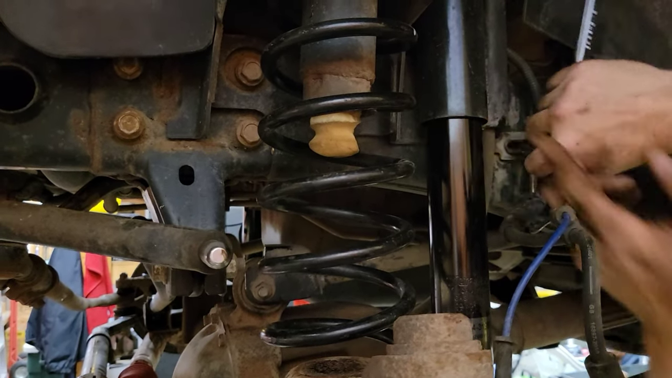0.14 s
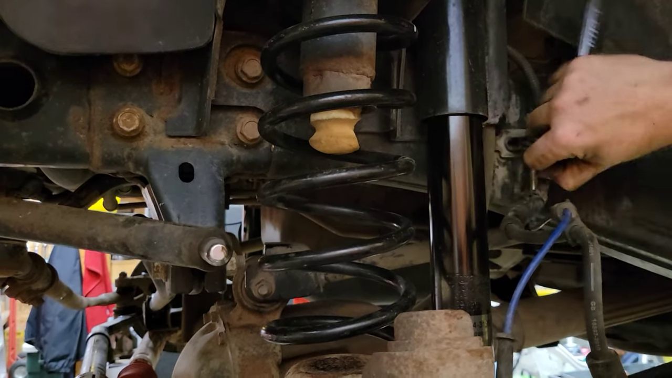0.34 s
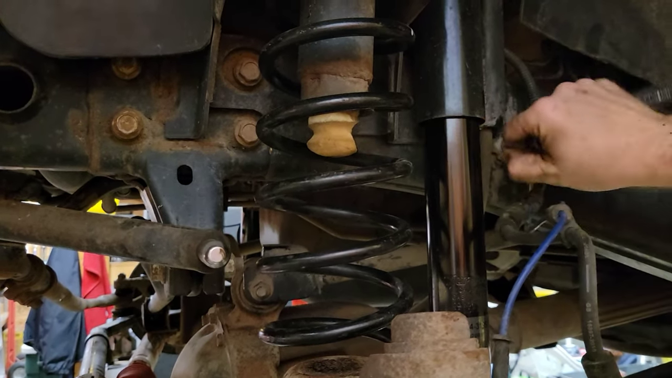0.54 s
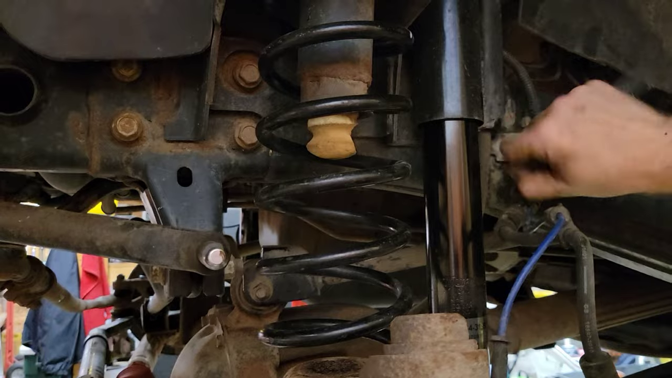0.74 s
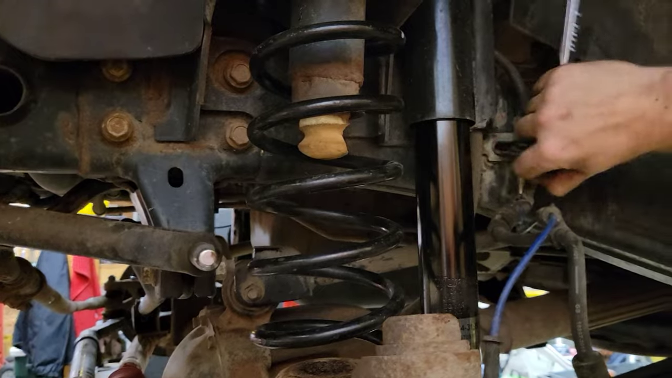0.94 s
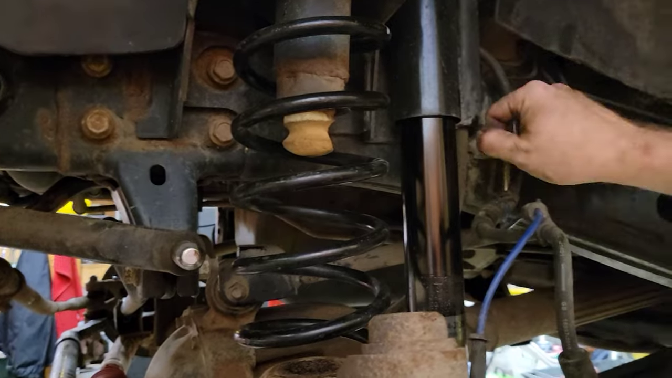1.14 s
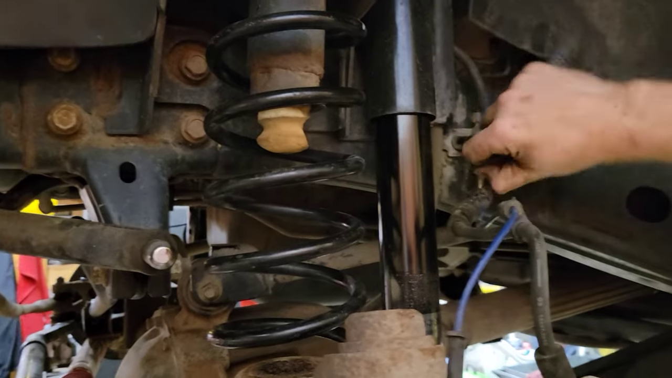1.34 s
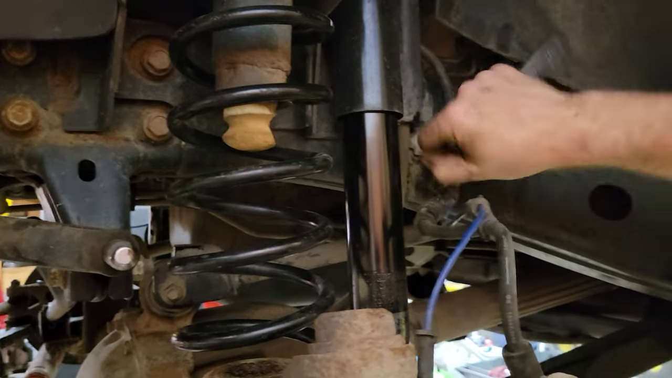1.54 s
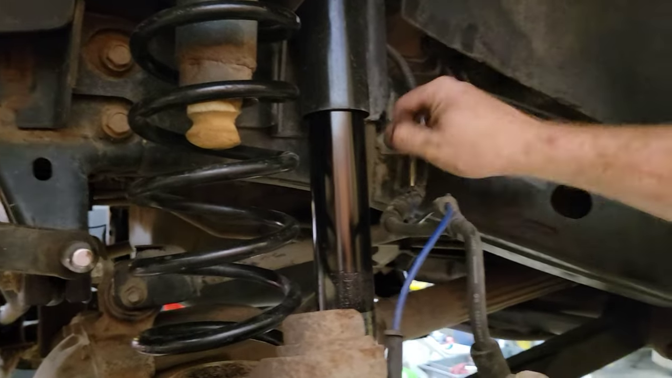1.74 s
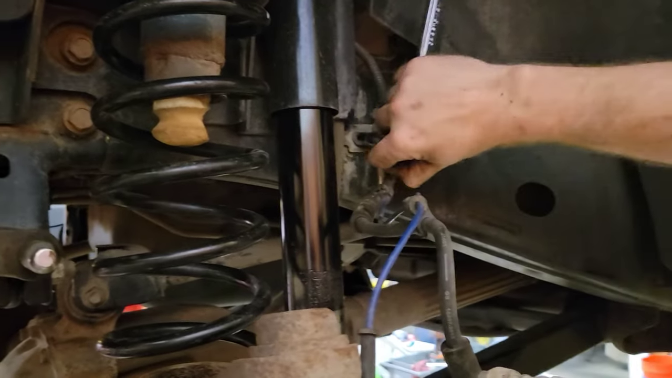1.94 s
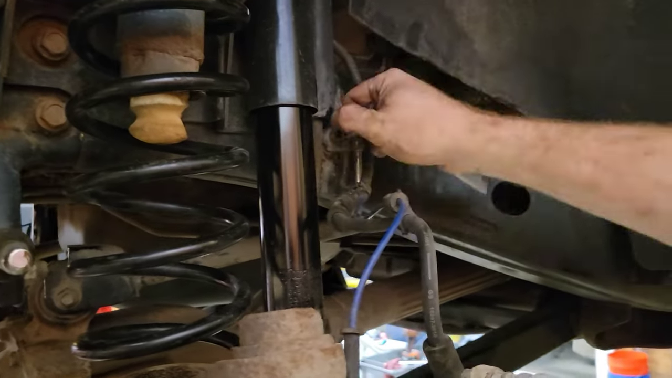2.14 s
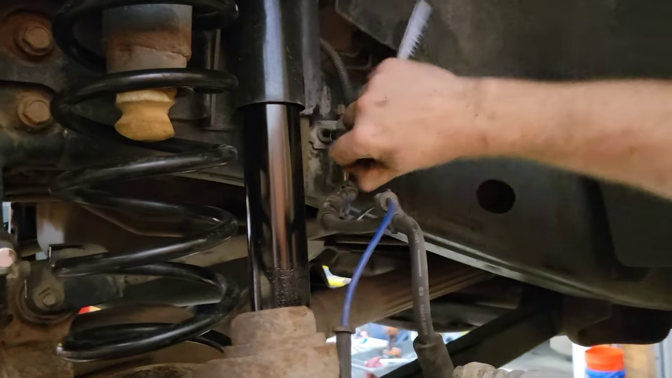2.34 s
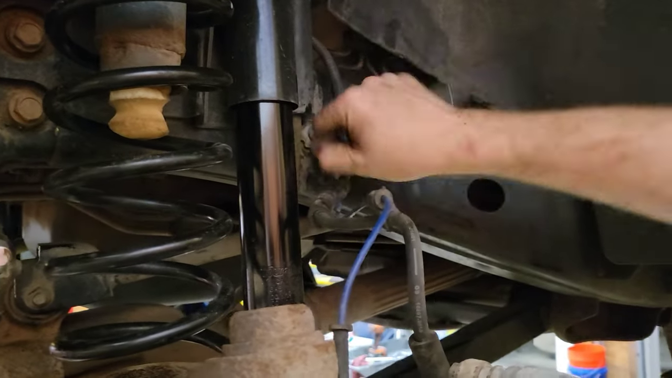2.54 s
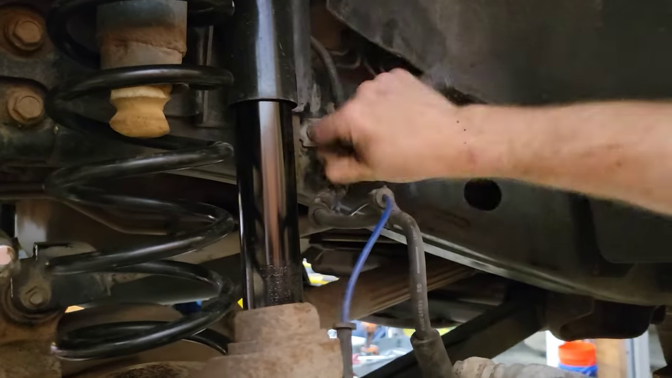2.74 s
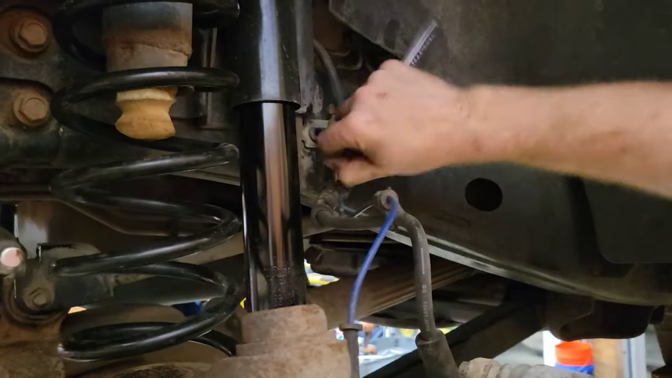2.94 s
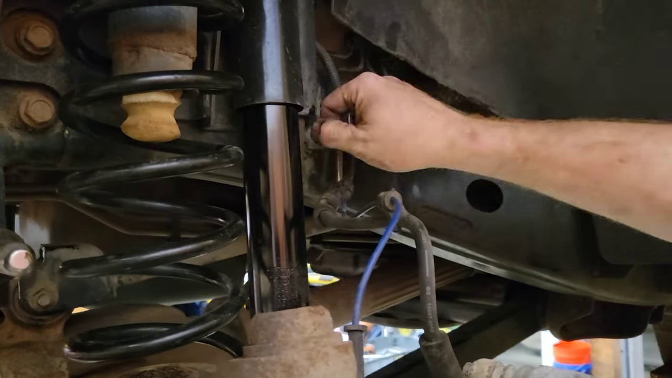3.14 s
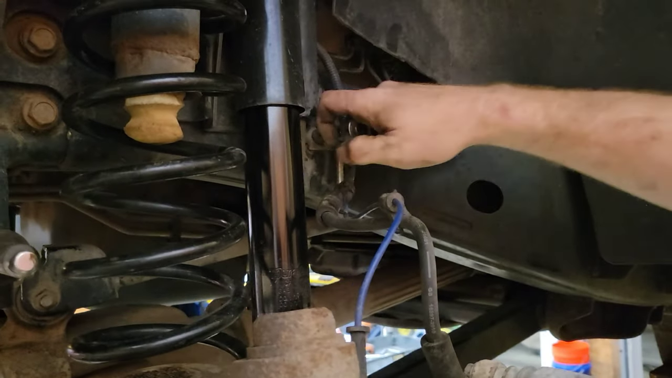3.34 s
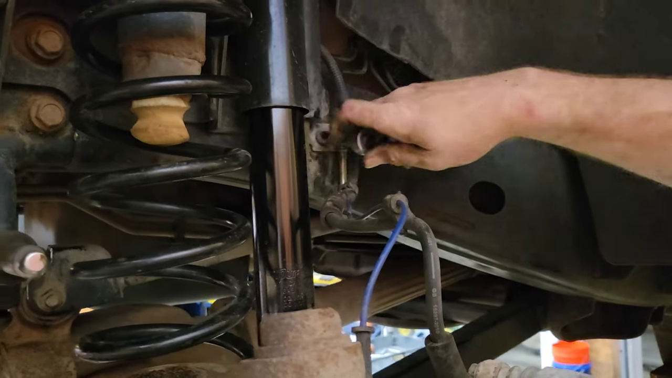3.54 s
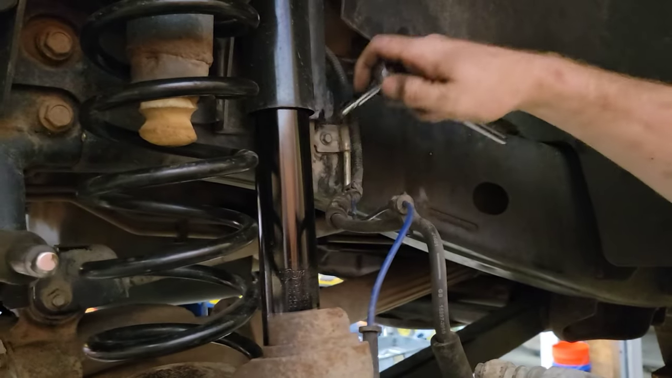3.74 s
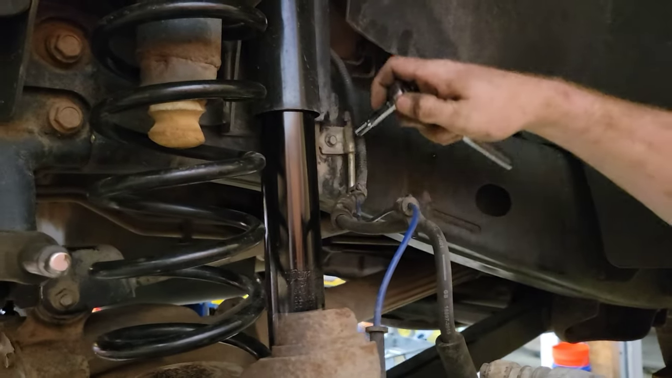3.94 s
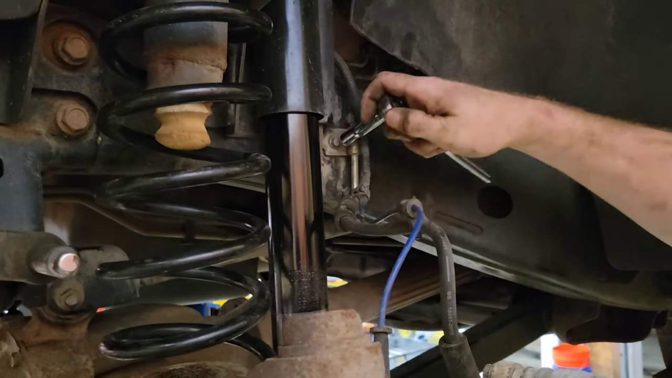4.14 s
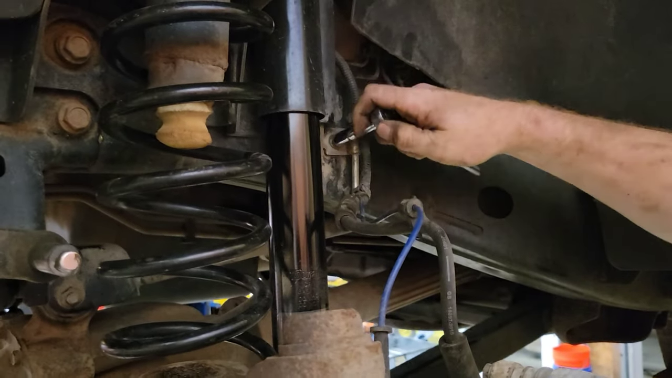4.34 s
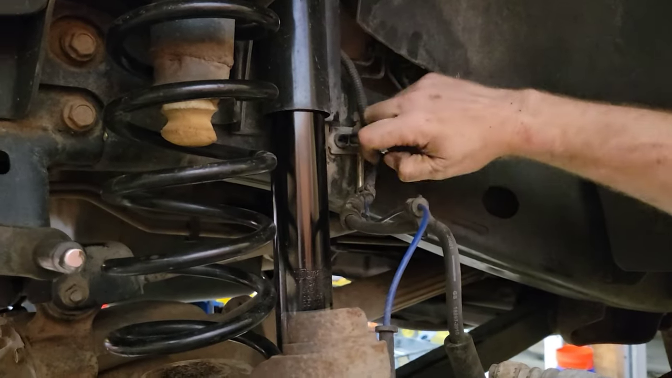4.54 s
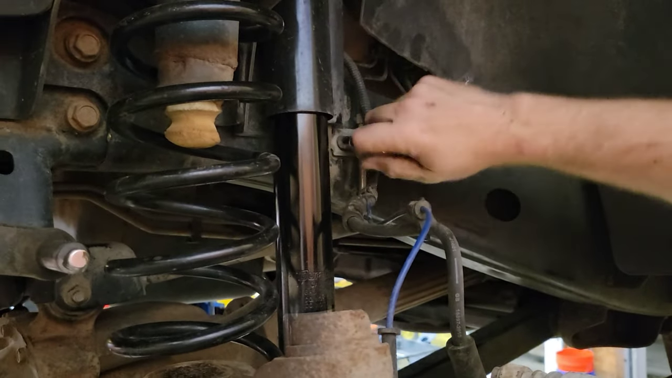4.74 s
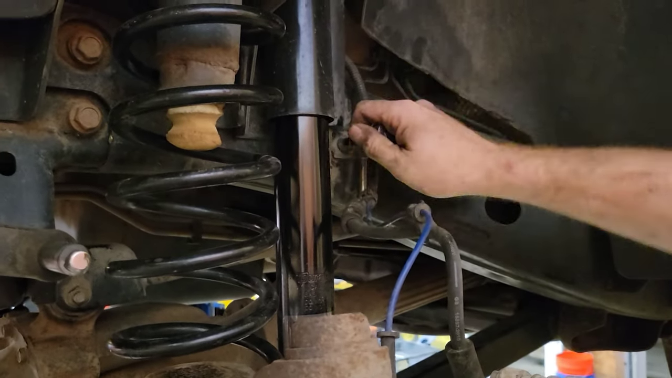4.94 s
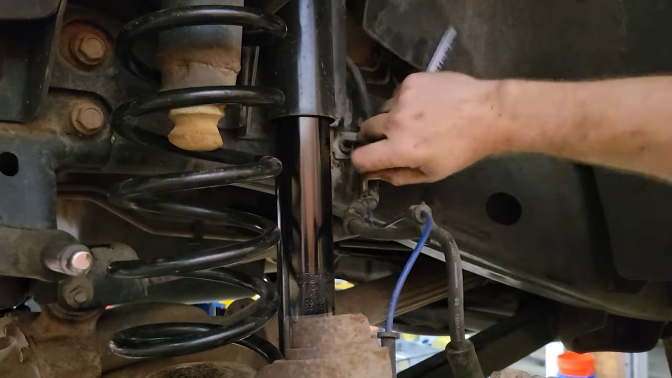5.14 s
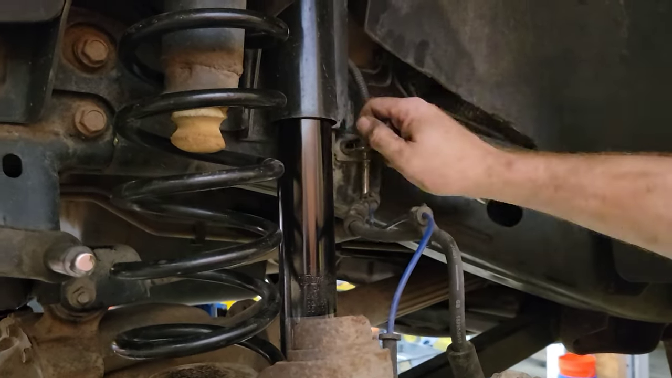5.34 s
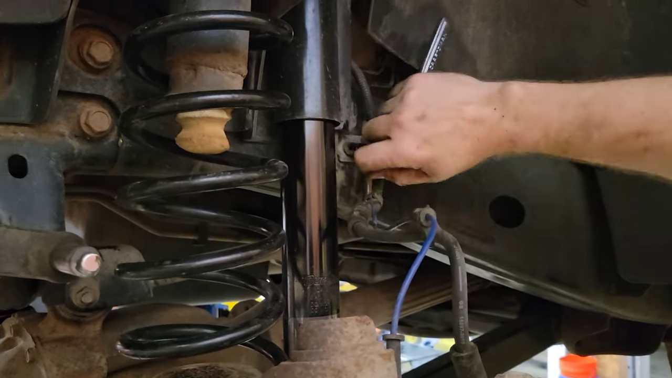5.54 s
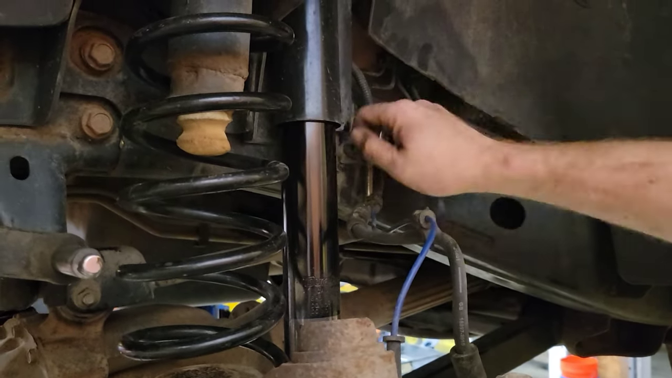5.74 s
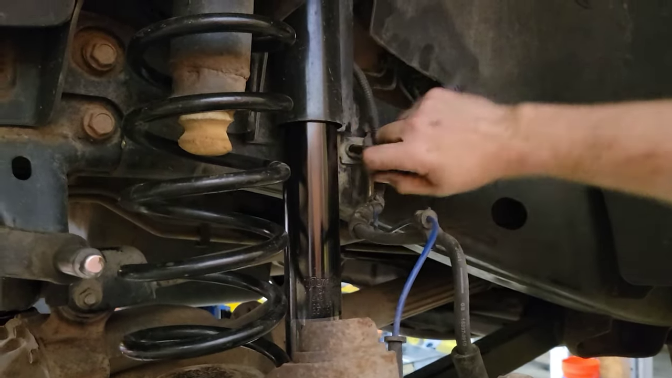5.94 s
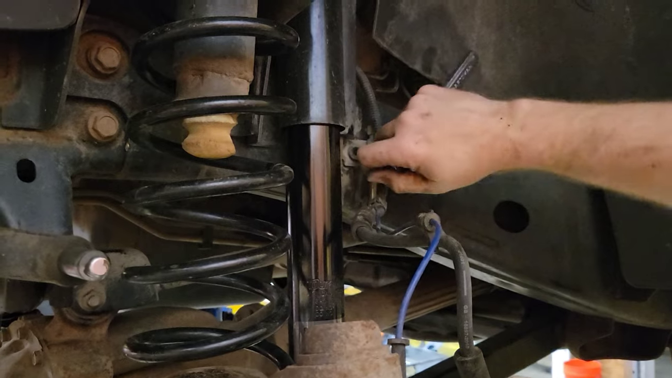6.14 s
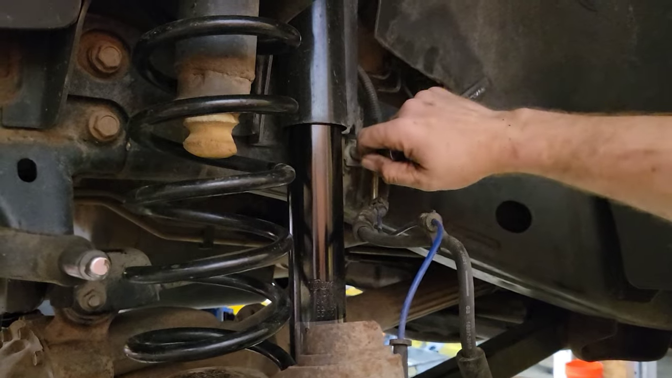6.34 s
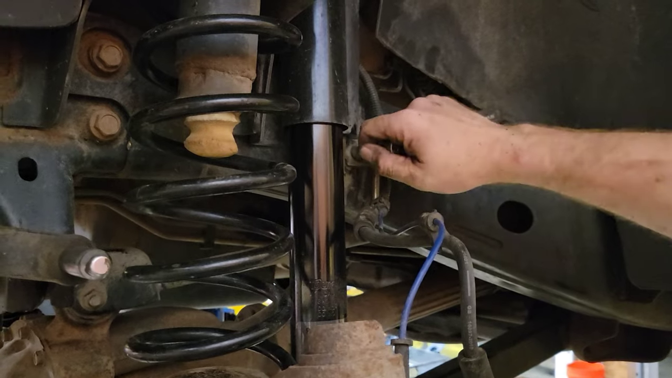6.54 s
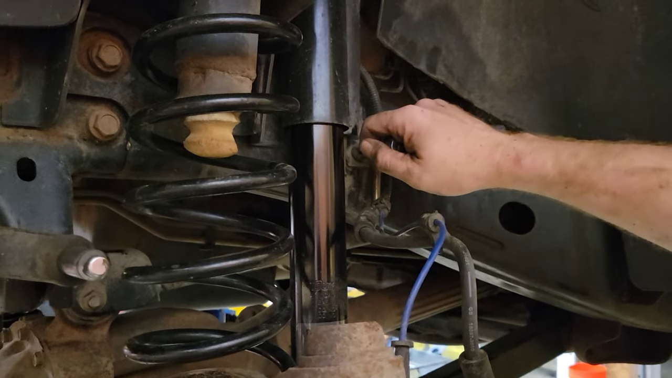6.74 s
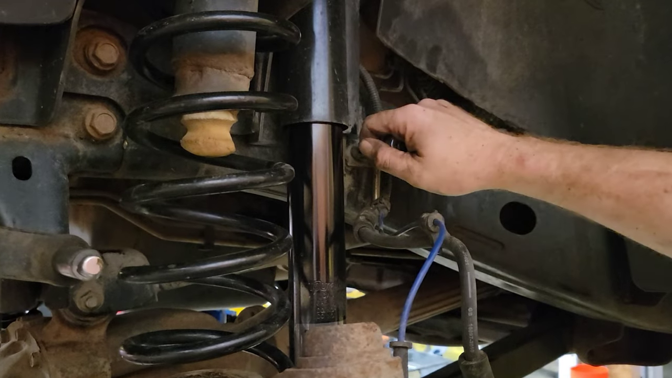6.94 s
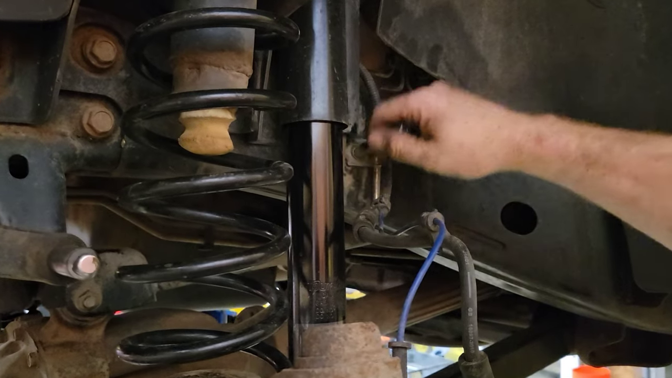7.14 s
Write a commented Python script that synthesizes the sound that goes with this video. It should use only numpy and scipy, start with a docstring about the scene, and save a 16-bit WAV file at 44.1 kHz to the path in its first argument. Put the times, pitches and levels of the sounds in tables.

```python
"""Garage open to a summer day: a socket ratchet works a bolt under a vehicle.
Pawl clicks and socket knocks strike tuned resonators (wrench, steel frame) and shaped noise for
the dense overtones and garage tail. Rub, bright hiss, low rumble and air are noise in the same bands.
Insects outside are narrow flickering noise bands; a nearer one rasps in short buzzes."""
import sys
import numpy as np
from scipy import signal
from scipy.io import wavfile

SR = 44100
rng = np.random.default_rng(int(sys.argv[2]) if len(sys.argv) > 2 else 0)


def ratio(d):
    """dB to gain"""
    e = np.asarray(d, float) / 20
    return 10 ** e


def materialize(psi):
    """Save the field psi as 16-bit PCM at rate SR to the path in sys.argv[1].

    A 1-D psi becomes a single channel; in a 2-D psi each row is a channel.
    """
    bounded = np.clip(np.atleast_2d(psi).T, -1, 1)
    quanta = np.round(bounded * 32767).astype(np.int16)
    wavfile.write(sys.argv[1], SR, quanta)


N = 321048

# bracket and frame modes around the bolt: hz, level_db (relative), t60_s
FRAME = [(198.4, -4, .25), (307.6, -9, 0.3), (355.5, -11, 0.59), (414, -6, 0.19), (487.2, -9.5, 0.25),
         (529.4, -2.5, 0.18), (611, -8.5, .25), (654.5, -9, 0.16), (843, -6, 0.24), (1066, -3.5, .22),
         (1185, -1, .22), (1189, -4.5, 0.11), (1330, -6, 0.15), (1413, -3.5, .15), (1578, -7, 0.23),
         (1793, -2, 0.071), (1850, 2.5, 0.12), (1960, -5, 0.12), (2183, 0.5, 0.08), (2440, -12, 0.071),
         (3130, -14.5, 0.082), (3700, -1.5, 0.11)]
# correlation of left and right: hz, correlation
LIKENESS = [(60, .995), (130, .99), (290, .85), (640, .5), (1400, 0), (15000, .02)]


def in_time(rows, axis=1):
    """Table column interpolated at every sample."""
    rows = np.array(rows)
    return np.interp(np.arange(N) / SR, rows[:, 0], rows[:, axis])


def at_hz(rows, hz, axis=1):
    """Table column read on a log-frequency axis."""
    rows = np.array(rows)
    return np.interp(np.log(hz), np.log(rows[:, 0]), rows[:, axis])


def rms_one(x):
    """Scale to rms 1."""
    return x / np.sqrt(np.mean(x ** 2) + 1e-20)


def drift(rate_hz):
    """Random curve: normal values of spread 1, two per cycle of rate_hz, joined by lines."""
    count = int(N / SR * rate_hz * 2) + 2
    return np.interp(np.arange(N), np.linspace(0, N, count), rng.standard_normal(count))


def dying(x, t60_s):
    """Exponential decay after each impulse, 60 dB of amplitude in t60_s."""
    return signal.lfilter([1], [1, -ratio(-60 / (t60_s * SR))], x + 1e-18)  # offset avoids denormals


def swell(x, rise_s):
    """Spread each impulse over a smooth bump of area 1."""
    window = np.hanning(int(rise_s * SR * 2) + 3)[1:-1]
    return signal.lfilter(window / window.sum(), [1], x)


def later(x, delay_s):
    """The same sound, delayed."""
    return np.pad(x, ((0, 0), (int(delay_s * SR), 0)))[:, :N]


def bandpass(x, low_hz, high_hz):
    """Butterworth band-pass."""
    return signal.sosfilt(signal.butter(2, [low_hz, high_hz], "band", fs=SR, output="sos"), x)


def resonance(x, hz, width_hz):
    """Band-pass run twice: flat top, steep skirts."""
    edges_hz = hz - width_hz / 2, hz + width_hz / 2
    return bandpass(bandpass(x, *edges_hz), *edges_hz)


def strikes(blows, hz, spread_db, signs=False):
    """Stereo impulse train, height of each blow read at this pitch; bass reaches both ears alike."""
    rows, bands_hz = np.array(blows[0]), blows[1]
    level_db = [np.interp(np.log(hz), np.log(bands_hz), row[1:-1]) for row in rows]
    pan_db = np.outer([.5, -.5], rows[:, -1])
    chance = rng.standard_normal((len(rows), 3)).T
    alike = np.clip(at_hz(LIKENESS, hz), 0, 1)
    scatter = np.sqrt(alike) * chance[2] + np.sqrt(1 - alike) * chance[:2]
    heights = ratio(level_db + pan_db + spread_db * scatter)
    if signs and alike < .5:
        heights = heights * rng.choice([-1, 1], (len(rows), 2)).T
    train = np.zeros((2, N))
    train[:, (rows[:, 0] * SR).astype(int)] = heights
    return train


def ringing(blows, modes, level_db, spread_db, rise_s, rough=True):
    """Each blow is a short contact, rough or smooth, that drives two-pole modes at scattered strengths."""
    out = 0
    grit = rng.standard_normal(N) * np.sqrt(rise_s * SR) if rough else 1
    for hz, mode_db, t60_s in modes:
        radius, angle = ratio(-60 / (t60_s * SR)), 2 * np.pi * hz / SR
        contact = swell(strikes(blows, hz, spread_db, signs=True), rise_s)
        push = grit * contact * ratio(level_db + mode_db)
        poles = [1, -2 * radius * np.cos(angle), radius ** 2]
        out = out + signal.lfilter([0, np.sin(angle)], poles, push + 1e-18)
    # high-pass at 0.7 of the lowest mode: nothing sounds far below it
    return signal.sosfilt(signal.butter(2, modes[0][0] * .7, "high", fs=SR, output="sos"), out)


def blow_pan(count):
    """Left minus right in dB for each blow, scattered around a lean to the right."""
    return -1.6 + 1.0 * rng.standard_normal(count)


def click_blows():
    """Pawl drops into teeth: rows of start_s, dB per band, pan_db; then the band centres."""
    # start_s, snap_db (relative)
    clicks = [(0.303, -15), (0.3904, -13.5), (0.9401, -14.5), (0.9524, -8), (0.965, -11), (0.983, -17),
              (1.0138, -18.5), (1.0595, -15.5), (1.4905, -16.5), (1.5016, -19.5), (1.517, -17.0),
              (1.536, -17), (1.565, -15.5), (1.598, -14.5), (1.9759, -14), (1.9942, -14.5), (2.0103, -12),
              (2.024, -13), (2.038, -12.5), (2.053, -14), (2.073, -15.5), (2.1175, -15.5), (2.466, -14),
              (2.4805, -17), (2.4918, -14.0), (2.5038, -15), (2.5175, -9.5), (2.5333, -13), (2.569, -15),
              (2.9293, -16), (2.944, -17), (2.958, -12), (2.971, -12), (2.989, -9.5), (3.012, -14),
              (4.687, -12.5), (4.7211, -14), (4.774, -14.5), (4.809, -13), (5.1991, -21.5), (5.2074, -14.5),
              (5.2177, -12.5), (5.233, -15.5), (5.257, -15), (5.285, -14.5), (5.63, -15), (5.6405, -17.5),
              (5.6496, -15.0), (5.6622, -13), (5.6761, -18), (5.6945, -13), (5.72, -14.5), (6.0888, -13.5),
              (6.101, -14.5), (6.1146, -16), (6.1286, -15.5), (6.1557, -16.0), (6.204, -17.0)]
    # wrench ring at 2-5 kHz as the grip changes: time_s, level_db (relative)
    click_ring = [(.3, -26.5), (1, -22.5), (1.55, -22.5), (2.05, -23.5), (2.5, -23), (3, -22.5),
                  (4.75, -21.5), (5.25, -22), (5.7, -21), (6.1, -18.5), (6.2, -19)]
    # band centres: hz
    bands_hz = [800, 3200, 9000]
    start_s, snap_db = np.transpose(clicks)
    snap_swing_db = snap_db - snap_db.mean()
    ring_db = np.interp(start_s, *np.transpose(click_ring)) + .2 * snap_swing_db
    # what a tooth passes to the frame in the bass
    bass_db = -49.5 + 4.0 * rng.standard_normal(len(start_s))
    return np.transpose([start_s, bass_db, ring_db, snap_db, blow_pan(len(start_s))]), bands_hz


def pawl(clicks):
    """Light scrape off the tooth tip, sharp snap, echo off the floor; wrench and frame ring on."""
    # broad, brief snap of the pawl tip: hz, level_db (relative), t60_s
    snap_modes = [(2410, -5, 0.025), (3270, -14.5, 0.003), (5900, -7, 0.0064), (7294, -1.5, 0.0089),
                  (11950, -7.5, 0.019), (14940, -3, 0.0041)]
    # wrench head: hz, level_db (relative), t60_s
    wrench_modes = [(2210, -1, .08), (2770, -6, .07), (3280, -1, .07), (3880, -1, .07), (4430, -5, .06),
                    (4900, -6, .05), (5290, -5, .06), (6090, -5, .05), (6780, -6, .03), (7260, 1, .035),
                    (7880, -3, .035), (11600, -3, .018), (12800, -7, .025)]
    tip = ringing(clicks, snap_modes, level_db=-6, spread_db=1.0, rise_s=.001)
    snap = ringing(clicks, snap_modes, level_db=1, spread_db=1.5, rise_s=0, rough=False)
    snap = later(snap, .0018)
    floor_echo = ratio(-10) * later(snap[::-1], .0056)  # ears swapped
    wrench = ringing(clicks, wrench_modes, level_db=-9, spread_db=2.5, rise_s=.0011)
    frame = ringing(clicks, FRAME, level_db=-11.5, spread_db=2.5, rise_s=.0001, rough=False)
    return tip + snap + floor_echo + wrench + frame


def knock_blows():
    """Socket and handle touch bolt and bracket: rows as for the pawl; harder contacts tilt to treble."""
    # start_s, level_db (at 3.5 kHz, relative), tilt_db_per_octave, thud_db (relative)
    knocks = [(0.208, -46.5, 3, -67.5), (0.2216, -50.5, -2.5, -64.5), (0.5138, -48, 2, -48.5),
              (0.5259, -41.5, -4, -83.5), (.5435, -37, 4, -41), (0.8951, -20, 0, -27.5),
              (1.1638, -37.5, 2, -55), (1.1723, -42, 6, -36.5), (1.4344, -46, -9, -53),
              (1.4461, -30, -6, -32.5), (1.475, -41, 6.5, -40), (1.6985, -37, 2, -50),
              (1.7126, -61, 9, -34.5), (1.9233, -38.5, 5, -55.5), (1.9534, -39, -1.5, -43),
              (1.9619, -34, 5, -51.5), (2.1833, -32, -4, -44), (2.1942, -33, -2, -33.5),
              (2.2045, -31, 8, -55), (2.2422, -50, 4, -42.5), (2.421, -45, -3, -51.5),
              (2.431, -46, 2, -54.5), (2.4415, -35, 1, -40.5), (2.661, -41, 3.5, -65), (2.673, -34, 3, -46),
              (2.69, -32.5, 3.5, -48.5), (2.722, -53, 9.5, -47.5), (2.8947, -33, -6.5, -38),
              (2.9065, -29, -2, -48.5), (3.1069, -34, 9.5, -42.5), (3.1319, -34, -4, -53),
              (3.1389, -25, 5.5, -34), (3.3393, -68, 5, -61), (3.4315, -61, -6, -71),
              (3.4612, -52, -9, -41.5), (3.4989, -39, -5.5, -42.5), (3.529, -59, -4, -53),
              (3.636, -32.5, -5, -43), (3.6513, -50, -14, -46), (3.6794, -45, 3, -50),
              (3.7197, -46.5, 5.5, -59), (3.7385, -45.5, -4.5, -58.5), (4.1542, -53, 1.5, -88),
              (4.4288, -20.5, -3.5, -63.5), (4.4435, -31.5, -2, -36), (4.5836, -52.5, -12, -52),
              (4.5995, -40, -4, -62), (4.6229, -35.5, -2, -33.5), (4.641, -36.5, 5.5, -54),
              (4.6738, -35, -1, -63), (4.7355, -30.5, 6, -49), (4.7833, -28, 3, -67), (4.828, -36, -1, -70),
              (4.9374, -24.5, 3.5, -44), (5.1476, -57, -10, -65), (5.1625, -37.5, -6.5, -42),
              (5.1874, -26, 4, -48), (5.3684, -33.5, 8, -48), (5.3791, -37.5, 0, -40.5),
              (5.5972, -34.5, -9.5, -45), (5.6094, -27.5, 0, -50), (5.7944, -36, 5, -73),
              (5.8042, -32.5, 8.5, -51), (5.818, -45.5, -7.5, -44), (6.0476, -44.5, -6, -67),
              (6.0621, -35.5, -4.5, -40), (6.0768, -34, 3, -60), (6.2865, -36, 0, -38.5),
              (6.2965, -37, 2.5, -38), (6.8285, -70, 5, -69), (6.971, -61, 15, -68)]
    # band centres, thud first: hz
    bands_hz = [330, 1300, 3500, 9000]
    start_s, level_db, tilt, thud_db = np.transpose(knocks)
    octaves = np.log2(np.divide(bands_hz[1:], bands_hz[2]))[:, None]
    clank_db = level_db + tilt * octaves - 3.0 * octaves ** 2  # droop either side of 3.5 kHz
    return np.transpose([start_s, thud_db, *clank_db, blow_pan(len(start_s))]), bands_hz


def socket(knocks):
    """Knocks ring the frame: light modes almost at once, heavy ones by a softer push."""
    thud_top_hz = 330
    light = [mode for mode in FRAME if mode[0] > thud_top_hz]
    heavy = [mode for mode in FRAME if mode[0] <= thud_top_hz]
    clank = ringing(knocks, light, level_db=-7.5, spread_db=3.0, rise_s=.0001, rough=False)
    thud = ringing(knocks, heavy, level_db=-5.0, spread_db=2.0, rise_s=.0015, rough=False)
    return clank + thud


def wash(blows, table, hz, crack_db, crack_t60_s, rise_s, spread_db):
    """Power envelope at one pitch: crack, fluttering steel decay, garage tail that builds and dies."""
    # garage tail: hz, level_db (relative), t60_s
    garage = [(211.8, -9.5, 0.21), (820, -4.5, 0.44), (2955, -9, 0.39), (8040, -16, 0.4),
              (14500, -30.5, 0.16)]
    power = swell(strikes(blows, hz, spread_db) ** 2, rise_s)
    # t60 halved throughout: these are powers
    crack = ratio(2 * crack_db) * dying(power, crack_t60_s / 2)
    steel_db = at_hz(table, hz) + 1.5 * drift(60)
    steel = ratio(2 * steel_db) * dying(power, at_hz(table, hz, axis=2) / 2)
    late = signal.lfilter([.002], [1, -.998], dying(power, at_hz(garage, hz, axis=2) / 2))
    return crack + steel + ratio(2 * at_hz(garage, hz)) * late


def steel_power(clicks, knocks, hz):
    """Power at one pitch of the steel's dense overtones, too close to tell apart."""
    # after clicks: hz, level_db (relative), t60_s
    click_wash = [(198, -38, 0.17), (503.3, -16, 0.23), (1201, -4.5, 0.2), (2500, 4.5, 0.14),
                  (3870, 5, 0.094), (7550, 3, 0.11), (10280, -9, 0.095), (11500, 2.5, 0.17),
                  (15500, -1.5, 0.048)]
    # after knocks: hz, level_db (relative), t60_s
    knock_wash = [(200, -12.5, 0.23), (533, -11, 0.1), (1300, 0, 0.32), (2600, 3.5, 0.16), (4140, 4, 0.083),
                  (7560, 3, 0.12), (10000, 4, 0.023), (11870, -2, 0.23), (15000, -7, 0.075)]
    click = wash(clicks, click_wash, hz, crack_db=10, crack_t60_s=.01, rise_s=.002, spread_db=1.0)
    knock = wash(knocks, knock_wash, hz, crack_db=-4.5, crack_t60_s=.029, rise_s=.0012, spread_db=1.5)
    return ratio(2 * -16) * click + ratio(2 * -13) * knock


def rub_and_hiss():
    """Grainy powers: the rub holds for the turn; the hiss dies away, often after a stroke's last click."""
    # socket turns or shifts on the bolt: start_s, length_s, rub_db (relative), hiss_db (relative)
    turns = np.array([(.27, .2, -62, -65), (1.06, 0.1, -53, -50), (1.6, 0.078, -53, -51),
                      (2.09, 0.37, -58, -55), (2.55, 0.19, -54, -59.5), (3.08, 0.18, -52.5, -57),
                      (3.5, 0.13, -55, -61.5), (3.75, 0.2, -57.5, -73), (4.55, 0.13, -48.5, -66),
                      (4.83, 0.19, -48.5, -48), (5.33, 0.32, -64, -72), (5.75, 0.068, -50, -62),
                      (6.23, 0.14, -55, -60)])
    since_s = np.arange(N) / SR - turns[:, :1]
    length_s, rub_db, hiss_db = turns.T[1:, :, None]
    rise_db = 119 * np.minimum(since_s, 0)  # slopes in dB per s
    rub_db = rub_db + rise_db - 112 * np.maximum(since_s - length_s, 0)
    hiss_db = hiss_db + rise_db - 96 * np.maximum(since_s, 0)
    grain_db = 2.0 * drift(28) + 2.0 * drift(110)
    return ratio(2 * (rub_db.max(axis=0) + grain_db)), ratio(2 * (hiss_db.max(axis=0) + grain_db))


def rub_and_hiss_power(rub, hiss, hz, width_hz):
    """Power in one band: dull rub plus bright hiss."""
    # hz, level_db_per_hz (relative)
    rub_colour = [(150, -13.5), (220, -12.5), (350, -8), (600, -14), (1200, -7), (3000, -28), (8000, -40),
                  (15000, -46.5)]
    # hz, level_db_per_hz (relative)
    hiss_colour = [(1500, -9), (3500, 0), (7000, 2), (10000, -1), (15000, -3.5)]
    dull = rub * width_hz * ratio(2 * (at_hz(rub_colour, hz) - 28.5)) * (hz > rub_colour[0][0])
    bright = hiss * width_hz * ratio(2 * (at_hz(hiss_colour, hz) - 41.5))
    return dull + bright * (hz > hiss_colour[0][0])


def rumble():
    """Power curve of the low rumble, which lurches at random around its set level."""
    # higher while the vehicle is being worked on: time_s, level_db (relative)
    levels = [(0, -59.5), (.5, -61.5), (.9, -53.5), (1.6, -56.5), (1.8, -53), (2.5, -53), (3.2, -54),
              (3.5, -58.5), (4.9, -60.5), (5.07, -54.5), (5.3, -59.5), (5.75, -56.5), (5.92, -53),
              (6.1, -59), (7.28, -60)]
    return ratio(2 * (in_time(levels) + 2 * drift(5.0)))


def rumble_power(surge, hz, width_hz):
    """Power of the rumble in one band, with a slow drift of its own."""
    # hz, level_db_per_hz (relative)
    colour = [(15, -37), (25, -7.5), (128, 1), (162, -16), (202, -9), (261, -31), (370, -17.5), (406, -22),
              (596, -34), (830, -27.5), (2000, -39.5), (2600, -70), (4400, -120)]
    band_db = at_hz(colour, hz) - 19.5 + 1.0 * drift(1)
    return surge * width_hz * ratio(2 * band_db) * (hz < colour[-1][0])


def air_power(hz, width_hz):
    """Power of the steady air noise in one band."""
    # hz, level_db_per_hz (relative)
    colour = [(1500, 5.5), (2200, -3.5), (3600, -14.5), (6200, -11.5), (9000, -7), (11000, -22),
              (13000, -7.5), (16000, -12)]
    return width_hz * ratio(2 * (at_hz(colour, hz) - 116.5))


def noise_bands():
    """Yield hz, width_hz and rms 1 stereo noise, correlated between ears as LIKENESS sets."""
    edges_hz = 25 * 2 ** np.arange(0, 9.6, .4)
    white = rng.standard_normal((2, 2, N))
    for k, (low_hz, high_hz) in enumerate(zip(edges_hz, edges_hz[1:])):
        mid, side = bandpass(white[k % 2], low_hz, high_hz)  # neighbours use different noise
        hz = np.sqrt(low_hz * high_hz)
        alike = np.clip(at_hz(LIKENESS, hz), -1, 1)
        noise = np.sqrt(1 + alike) * mid + np.sqrt(1 - alike) * side * [[1], [-1]]
        yield hz, high_hz - low_hz, rms_one(noise)


def noisy_parts(clicks, knocks):
    """Dense steel ringing, rub, hiss, rumble and air: powers add in one bank of noise bands."""
    out, surge = 0, rumble()
    rub, hiss = rub_and_hiss()
    for hz, width_hz, noise in noise_bands():
        power = rumble_power(surge, hz, width_hz)
        if hz > 150:  # only rumble below
            power = power + rub_and_hiss_power(rub, hiss, hz, width_hz)
            power = power + air_power(hz, width_hz)
            power = power + steel_power(clicks, knocks, hz)
        out = out + np.sqrt(power) * noise
    return out * ratio([[-.4], [.4]])


def insects():
    """Many singers blur into narrow, flickering bands of noise."""
    # hz, width_hz, level_db (relative)
    singers = [(2420, 300, 0), (2830, 380, -5), (3130, 300, -14), (2200, 200, -17), (4270, 160, -8),
               (4840, 220, 0), (4600, 900, -5), (5350, 700, -8)]
    # swell of the chorus: time_s, drone_db (relative), whine_db (relative)
    chorus = [(0, -64, -75), (1.3, -64, -75.5), (3.3, -66, -76.5), (4.3, -64.5, -75.5), (5.5, -65.5, -71),
              (6.5, -64, -74), (6.7, -64.5, -78.5), (6.85, -66.5, -68), (7.05, -66.5, -72.5),
              (7.28, -65, -80)]
    out = 0
    for hz, width_hz, level_db in singers:
        band = rms_one(resonance(rng.standard_normal((2, N)), hz, width_hz))
        chorus_db = in_time(chorus, axis=1 if hz < 4000 else 2)
        out = out + ratio(level_db + 1.5 * drift(3.4) + chorus_db) * band
    return out * ratio([[-.8], [.8]])


def rasps():
    """One nearer insect: short dry buzzes of noise in two high bands."""
    # start_s, level_db (relative)
    buzzes = np.array([(2.39, -56), (2.845, -58.5), (3.374, -58), (3.535, -55), (3.778, -58),
                       (3.955, -57.5), (4.146, -58.5), (4.322, -64)])
    # hz, width_hz, level_db (relative)
    bands = [(7590, 940, -2), (9600, 2000, 4)]
    starts = np.zeros(N)
    starts[(buzzes[:, 0] * SR).astype(int)] = ratio(buzzes[:, 1] - 9)
    envelope = signal.lfilter([.004], [1, -.996], dying(starts, 0.26))
    noise = rng.standard_normal((2, N))
    buzz = sum(ratio(db) * rms_one(resonance(noise, hz, width_hz)) for hz, width_hz, db in bands)
    return envelope * buzz


def scene():
    """Wrench, frame and surroundings."""
    clicks, knocks = click_blows(), knock_blows()
    return pawl(clicks) + socket(knocks) + noisy_parts(clicks, knocks) + insects() + rasps()


def band_limit(x):
    """A steep low-pass at the top of the band."""
    return signal.sosfilt(signal.butter(12, 16810, fs=SR, output="sos"), x)


def record(dry):
    """Peaks are rounded, then a steep low-pass cuts the top (50 dB down at 16.7 kHz)."""
    rounded = .9 * np.tanh(dry / .9)
    mix = signal.sosfilt(signal.cheby2(10, 50, 16700, fs=SR, output="sos"), rounded)
    return band_limit(mix)


dry = scene()
out = record(dry)
materialize(out)
```